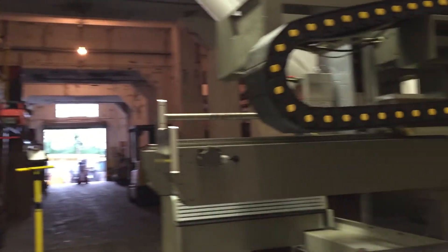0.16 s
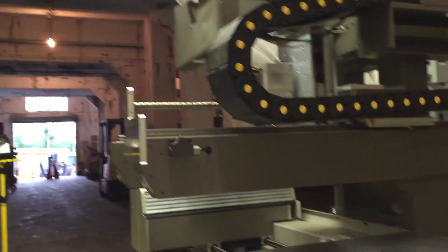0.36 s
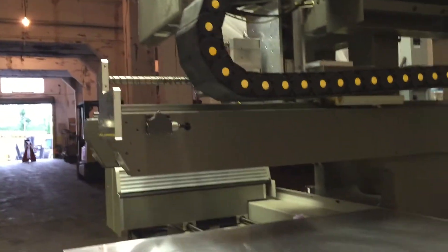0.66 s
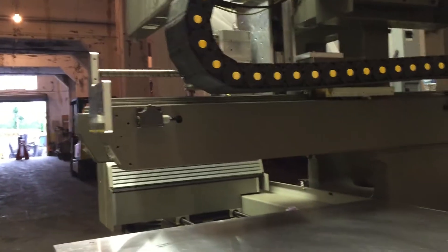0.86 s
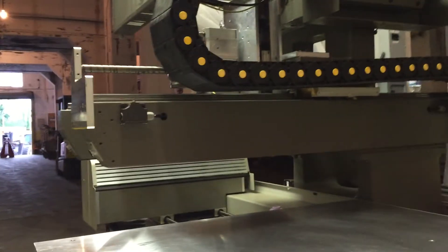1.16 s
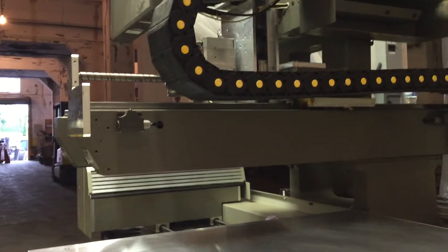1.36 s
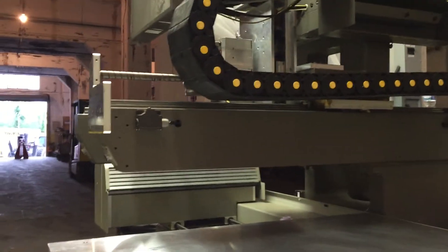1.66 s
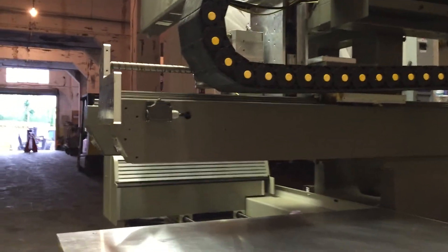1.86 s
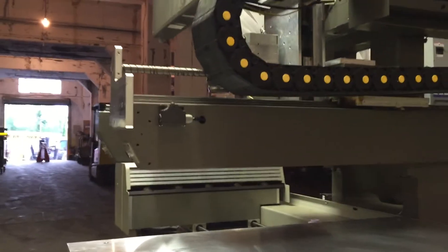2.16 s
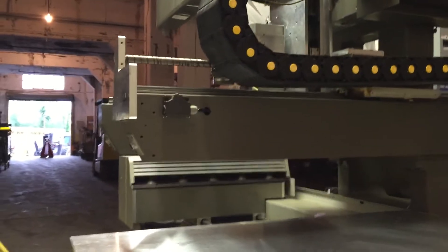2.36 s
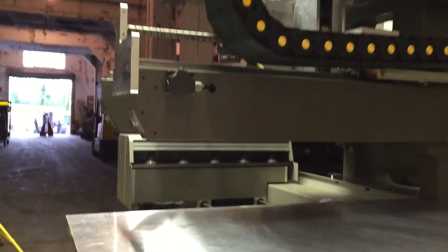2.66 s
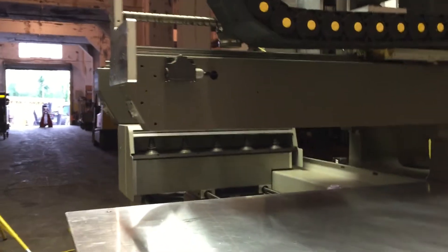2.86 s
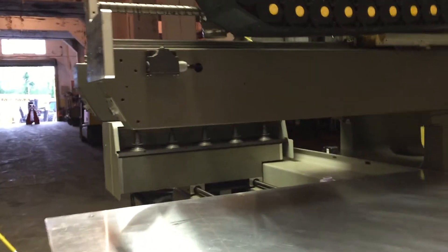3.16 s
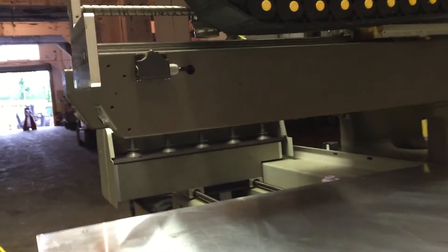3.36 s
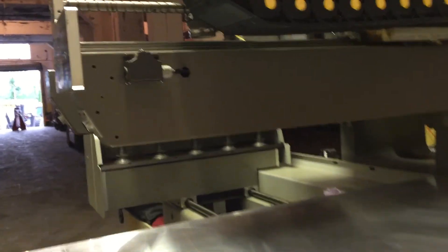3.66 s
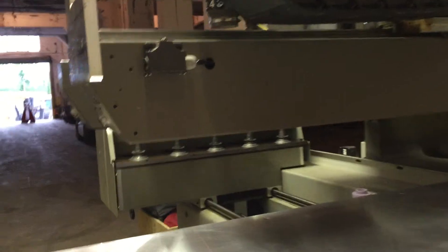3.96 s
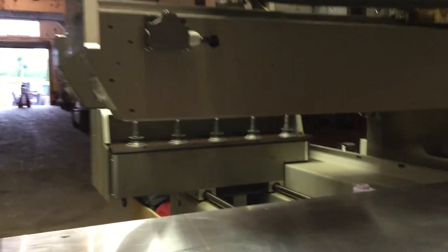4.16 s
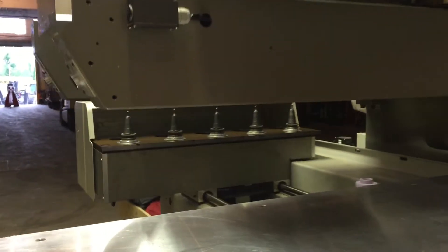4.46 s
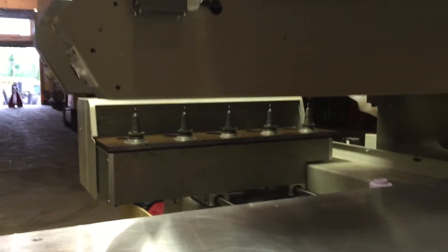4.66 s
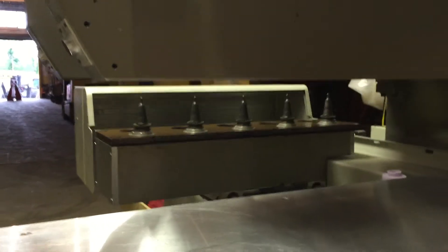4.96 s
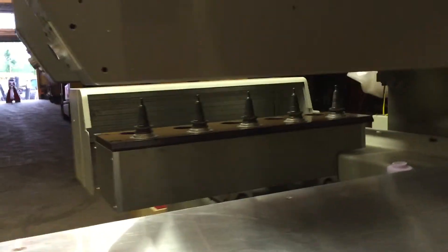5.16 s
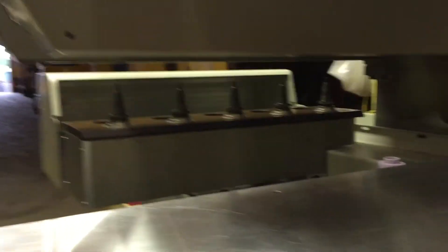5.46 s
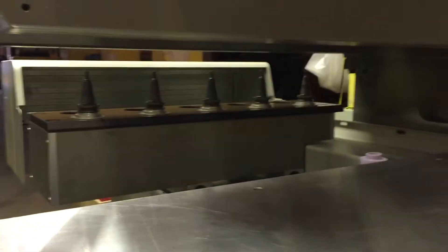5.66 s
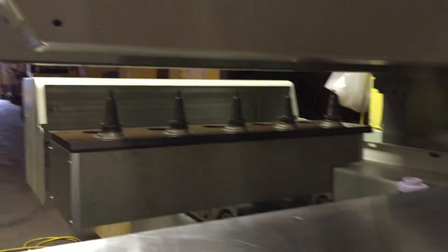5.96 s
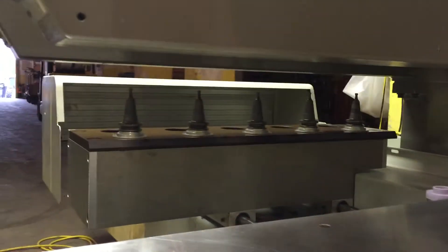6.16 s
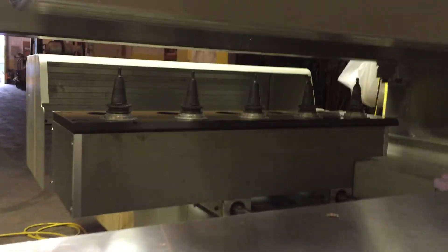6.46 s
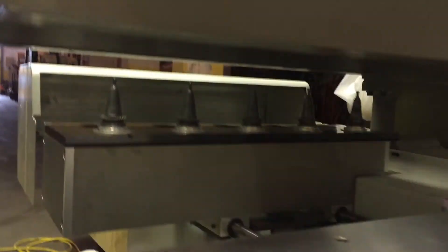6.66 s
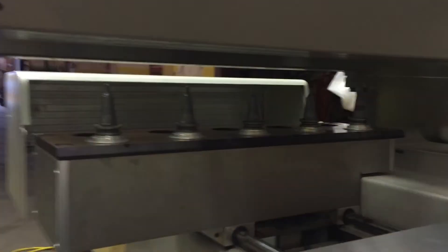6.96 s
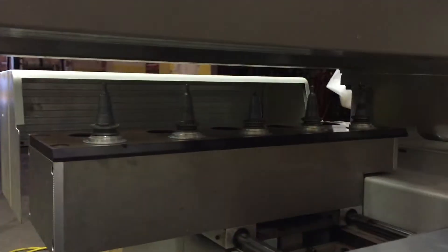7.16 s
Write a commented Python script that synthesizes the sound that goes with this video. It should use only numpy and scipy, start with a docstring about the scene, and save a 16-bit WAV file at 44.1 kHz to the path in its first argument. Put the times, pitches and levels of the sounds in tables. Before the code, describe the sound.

Close beside a steel machine in a large, reverberant workshop, heard in mono. From 0 s a heavy gantry is already rolling, a rough rumble with motor hum and thin high servo whine; a light tick and knock come at 0.3 s, and it brakes to rest by about 1 s, leaving an echo tail and faint shop noise. At 1.56 s a valve spits twice rapidly, and a soft steady air hiss begins; small taps at 2.06 s. At 3.46 s a thump and spit open a strong blast of compressed air, bright, hollow and breathy, its tone sinking slightly, lasting until about 5.3 s. Beneath it a rack slides out with a low drone and growing thrum. Clunks cluster at 5.2-5.3 s and 5.55 s, when the thin hiss shuts off. From 6.1 s the gantry rolls again, rumbling and whining, with heavy knocks at 6.4, 6.6 and 6.8 s, then a crisp tick near 7 s as it slows.

```python
"""A CNC router in a big workshop changes its tool, heard in mono, close to the steel frame.
First the gantry, already moving, rolls to a stop: filtered noise for the rolling, tones for the whining servos.
A valve spits in short noise bursts and purge air starts to hiss. Then a cylinder vents in a long blast of noise
with a breathy tone, while the tool rack slides out with a drone and clunks against its stop: struck resonances.
Last, the gantry rolls on with more knocks and ticks. A low thrum and faint shop noise lie under it all."""
import sys
import numpy as np
from scipy import signal
from scipy.fft import rfft, irfft, next_fast_len
from scipy.io import wavfile
from scipy.ndimage import uniform_filter1d

SR = 44100
rng = np.random.default_rng(int(sys.argv[2]) if len(sys.argv) > 2 else 0)


def bounce(signal):
    """Save signal as a 16-bit WAV file at the path given by the first command-line argument."""
    frames = np.transpose(np.atleast_2d(signal))
    limited = np.clip(frames, -1, 1)
    pcm = np.round(limited * 32767).astype(np.int16)
    wavfile.write(sys.argv[1], SR, pcm)


N = 321930
TIME = np.arange(N) / SR   # seconds

# The gantry's moves. Each row: start in seconds, run-up in seconds, cruise in seconds, braking in seconds,
# torque ripple at full speed in Hz, rumble level in dB, rush level in dB.
MOVES = [(-.5, 0.42, 0.53, 0.506, 200, -32, -32), (6.075, .39, 0.43, 0.45, 240.6, -27.5, -31.5)]
# Colour of the rolling in the first move. Each row: frequency in Hz, relative level in dB per Hz.
FIRST_MOVE_COLOUR = [(120, -37), (150, -9), (190, 1), (245, -7), (280, -3), (320, -5), (370, -1.5),
                     (540, 0.5), (640, -5), (850, -9.5), (1900, -16.5), (3300, -25.5), (4800, -34),
                     (6000, -33), (15000, -47)]
# Colour of the rolling in the second move. Each row: frequency in Hz, relative level in dB per Hz.
SECOND_MOVE_COLOUR = [(130, -16.5), (190, -6), (250, -3), (310, -6), (400, 1.5), (500, 0), (650, -7),
                      (800, -13.5), (1400, -13.5), (2500, -21.5), (3400, -23.5), (4900, -33.5), (6200, -32),
                      (7600, -38), (15000, -43.5)]
# Whine that follows the ripple. Each row: multiple of the switching rate,
# number of ripple steps above it (minus: below), relative level in dB.
WHINE_SIDEBANDS = [(1, -1, -0.5), (1, 1, 0.5), (1, 2, -21)]
# Servo whine during each move, one list of rows per move. Each row: time in seconds, level in dB.
SERVO_WHINE = [
    [(0.0, -45), (0.082, -53), (0.256, -59), (0.332, -46), (0.462, -65), (0.544, -63), (0.664, -53),
     (0.722, -63), (0.798, -55), (0.862, -71), (0.912, -80), (0.95, -92)],
    [(6.0, -82), (6.046, -66), (6.438, -41), (6.572, -50), (6.726, -44), (6.752, -51), (6.926, -51),
     (6.958, -79), (6.988, -49), (7.14, -70), (7.23, -57), (7.3, -63)],
]
# Steady whine of the servos. Each row: multiple of the switching rate, level in dB.
HOLDING_WHINE = [(1, -73.5), (2, -69), (3, -74.5), (4, -95)]
# Bright jet of the cylinder. Each row: frequency in Hz, relative level in dB per Hz.
JET_COLOUR = [(900, -21), (2500, -35), (4200, 1.5), (6700, 2.5), (7600, -1.5), (8900, 1.5), (9900, 0),
              (10400, -6), (11000, -1.5), (13300, -0.5), (15300, -2)]
# Hollow ring of the cylinder's port. Each row: frequency in Hz, relative level in dB per Hz.
PORT_COLOUR = [(400, -57), (750, -21), (1100, -13), (1500, -2.5), (1750, -3), (2150, -4.5), (2650, -1.5),
               (3080, 0.5), (3450, -0.5), (4000, -4), (5500, -20)]
# Valve spits. Each row: start in seconds, level in dB, time to fall 60 dB in seconds.
VALVE_SPITS = [(1.558, -35, 0.28), (1.576, -28, 0.61), (3.477, -38, .12)]
# Colour of the spits. Each row: frequency in Hz, relative level in dB per Hz.
SPIT_COLOUR = [(400, -25), (760, 3), (1020, -24), (1400, -2), (2300, -8.5), (2950, 2), (4200, -7),
               (6200, 2), (7200, -2.5), (8600, 3.5), (10400, -3), (11400, -0.5), (15300, -3.5)]
# Colour of the purge air. Each row: frequency in Hz, relative level in dB per Hz.
PURGE_COLOUR = [(110, -6), (175, -8.5), (260, -2.5), (350, -17), (600, -6), (760, -16.5), (1000, -9),
                (1500, -10), (2200, -5.5), (3200, -1), (4600, 1.5), (9200, -5.5), (10400, -14.5),
                (13200, -16.5), (15300, -6)]
# Drone of the sliding rack. Each row: frequency in Hz, relative level in dB per Hz.
SLIDE_COLOUR = [(120, -22), (230, -0.5), (310, -11.5), (380, -0.5), (450, -10), (535, -4.5), (600, -15.5),
                (850, -19), (1200, -7), (1700, -18.5), (5000, -27.5)]
# Blows on the frame. Each row: start in seconds, strength in dB, low thud level in dB,
# time to fall 60 dB in seconds, brightness (lowpass) in Hz.
FRAME_BLOWS = [(0.303, -40, -38, .2, 900), (1.575, -43, -37.5, 0.71, 2000), (2.056, -42.5, -56, 0.38, 5000),
               (2.081, -49, -45, 0.27, 584), (3.457, -35.5, -39, 0.27, 500), (3.492, -37, -38, 0.59, 1010),
               (5.219, -20.5, -40, 0.094, 2200), (5.236, -25, -48, 0.29, 2000),
               (5.274, -26.5, -50, .1, 2200), (5.314, -26, -42, 0.14, 1790), (5.54, -17.5, -50, 0.07, 1030),
               (5.558, -24.5, -40, 0.31, 970), (6.389, -25, -24, 0.26, 600), (6.6, -16.5, -23, 0.055, 945),
               (6.783, -18.5, -23, .1, 645), (6.965, -27, -35, 0.19, 1500)]
# Resonances of the frame. Each row: frequency in Hz, width in Hz, relative level in dB.
FRAME_MODES = [(380, 59, -2.5), (476, 43, -7), (647, 140, -3), (878, 140, -4.5), (1130, 60, -0.5),
               (1400, 95, -5.5), (1800, 520, -1)]
# Guide rods that ring on. Each row: frequency in Hz, width in Hz, relative level in dB.
ROD_MODES = [(660, 8, -6), (1215, 11, -2)]
# Colour of the thuds. Each row: frequency in Hz, relative level in dB per Hz.
THUD_COLOUR = [(50, -17), (110, -15), (170, 4.5), (250, -4.5), (400, -13)]
# Small metal ticks. Each row: start in seconds, level in dB, time to fall 60 dB in seconds.
METAL_TICKS = [(.306, -37.5, 0.042), (.31, -42, 0.31), (6.237, -40, .04), (6.594, -38, .08),
               (6.782, -39, 0.11), (6.988, -21, 0.014)]
# Colour of the ticks. Each row: frequency in Hz, relative level in dB per Hz.
TICK_COLOUR = [(1500, -30), (3500, 4.5), (5000, 0), (6600, -1), (7600, -2), (9000, -7), (15000, -12)]
# Colour of the machine's thrum. Each row: frequency in Hz, relative level in dB per Hz.
THRUM_COLOUR = [(20, -36), (40, -18), (55, -7), (72, -2.5), (85, 2.5), (100, 3.5), (120, -1.5), (150, -2.5),
                (220, -21)]
# Colour of the shop floor noise. Each row: frequency in Hz, relative level in dB per Hz.
SHOP_COLOUR = [(50, -7), (100, -26), (160, 6.5), (240, -6), (310, -12.5), (570, -18), (800, -12),
               (1200, -8), (1900, -13.5), (2400, -28), (4000, -24), (6000, -37), (15000, -40)]

# Rolling
EASING_S = 0.14   # the drives round off each change of speed
RUMBLE_LAW, RUSH_LAW, SIZZLE_LAW = 0.57, 1.0, 1.74   # each grows as this power of speed
SIZZLE_HZ = 4430   # above this the rush needs more speed
PULL_DB, BRAKE_DB = 4, 2.5   # extra rumble while the drives speed up, and while they brake

# Motors and servos
SWITCHING_HZ = 3124.7
HUM_DB, HUM_LAW = -24, 0.43   # motor hum on the beam's resonance; power of speed
BEAM_HZ, BEAM_WIDTH_HZ = 236, 10.2
SIDEBAND_DB, SIDEBAND_LAW = -53.5, 1.1   # gliding whine at full speed; power of speed
SIDEBAND_PULL_DB = 7   # stronger while the drives speed up
OVERTONE_DB, OVERTONE_LAW = -68, 0.5   # the whine's octave at full speed; power of speed
SETTLE_DB, SETTLE_S = -68.5, 0.064   # the switching tone swells as servos take up and put down the load

# Cylinder exhaust: held level (dB), surplus on opening (dB), rise (s)
BLAST_OPENS_S = 3.492
JET_DB, JET_SURGE_DB, JET_RISE_S = -26, 2.5, 0.038
PORT_DB, PORT_SURGE_DB, PORT_RISE_S = -30, 7, 0.046
SURGE_S, BLAST_HOLD_S, BLAST_FADE_S = 0.093, 1.672, 0.28   # the surge peaks, the flow holds, it runs empty
CRACK_SHARE = 0.83   # the valve snaps this far open at once, then eases the rest of the way
LEAK_DB = -64.5   # air that still seeps from the empty cylinder
# Edge tone of the port: it swells against the port's ring and sinks with the pressure
EDGE_DB, EDGE_SWELL_S, EDGE_HOLD_S, EDGE_FADE_S = -0.5, 0.6, 0.59, 0.89
EDGE_HZ, EDGE_SHARP_HZ, EDGE_SAG_S = 2990, 380, 0.73

# Purge air, and the rack sliding on its rods
PURGE_DB, PURGE_ENDS_S, PURGE_FADE_S = -38.5, 5.56, 0.14
SLIDE_STARTS_S, SLIDE_RISE_S, SLIDE_HOLD_S, SLIDE_FALL_S, SLIDE_DB = 3.72, 0.83, 0.98, 1, -43.5

# Thrum: idle machine (dB), what it gains as it grows from the rack's start time on (dB), rolling gantry (dB
# against its rumble)
IDLE_THRUM_DB, RISEN_THRUM_DB, TRAVEL_THRUM_DB = -58, -49.5, -13.5
JOLT_DB, JOLT_T60_S = -45.5, 0.72   # the cylinder jolts the machine as it vents

HALL_T60_S = 1.97   # time for the hall's echo to fall 60 dB
CUTOFF_HZ = 15280   # top of the finished sound


def from_db(db):
    """Decibels to gain."""
    return 10 ** (np.asarray(db) / 20)


def rms_one(x):
    """Scale to unit rms."""
    return x / np.sqrt(np.mean(x ** 2) + 1e-20)


def drift(rate_hz):
    """Slow random wandering with rms 1, made at a fortieth of the sample rate."""
    r = np.exp(-80 * np.pi * rate_hz / SR)
    raw = rng.standard_normal(N // 40 + 2002)
    slow = signal.lfilter([1], [1, -2 * r, r * r], raw)[2000:]   # skip the filter's start
    return np.interp(np.arange(N) / 40, np.arange(len(slow)), rms_one(slow))


def noise(colour):
    """Noise with a given spectrum, falling 24 dB per octave beyond its ends; rms 1."""
    size = next_fast_len(N)
    octave = np.log2(np.maximum(np.arange(size // 2 + 1) * SR / size, 1))
    hz, db = np.transpose(colour)
    points = np.log2(hz)
    beyond = np.maximum(points[0] - octave, 0) + np.maximum(octave - points[-1], 0)
    gain = from_db(np.interp(octave, points, db) - 24 * beyond)
    spectrum = rfft(rng.standard_normal(size)) * gain
    return rms_one(irfft(spectrum, size)[:N])


def lowpass(x, hz, order=2):
    """Take off the top."""
    sos = signal.butter(order, min(hz, 0.45 * SR), fs=SR, output="sos")
    return signal.sosfilt(sos, x + 1e-18)


def resonate(x, hz, width_hz):
    """One resonance; white noise keeps its power."""
    r = np.exp(-np.pi * width_hz / SR)
    feed = np.sqrt((1 - r * r) / 2) * np.array([1, 0, -1])
    feedback = [1, -2 * r * np.cos(2 * np.pi * hz / SR), r * r]
    return signal.lfilter(feed, feedback, x + 1e-18)


def phase_of(hz):
    """Running phase of a gliding tone."""
    return 2 * np.pi * np.cumsum(hz) / SR


def unsteady_tone(phase, width_hz):
    """A tone whose strength and phase wander at random; rms near 1."""
    return drift(width_hz) * np.cos(phase) + drift(width_hz) * np.sin(phase)


def opens(at_s, rise_s=0.0056):
    """A straight opening from 0 to 1, as of a valve."""
    return np.clip((TIME - at_s) / rise_s, 0, 1)


def empties(at_s, fade_s):
    """Air pressure running out, slowly at first."""
    return np.exp(-(np.maximum(TIME - at_s, 0) / fade_s) ** 2)


def swell(start_s, rise_s, hold_s, fall_s):
    """Straight rise, hold and straight fall, 0 to 1."""
    corners = start_s + np.cumsum([0, rise_s, hold_s, fall_s])
    return np.interp(TIME, corners, [0, 1, 1, 0])


def bursts(rows):
    """Envelope of sudden starts that die away, from rows (s, dB, t60)."""
    total = np.zeros(N)
    for start_s, db, t60 in rows:
        fall_db = 60 * np.clip((TIME - start_s) / t60, 0, 3)
        total += opens(start_s, rise_s=0.001) * from_db(db - fall_db)
    return total


def level(rows, fade_s=0.08):
    """Gain along a dB curve, dying away outside its span."""
    s, db = np.transpose(rows)
    outside = np.maximum(s[0] - TIME, 0) + np.maximum(TIME - s[-1], 0)
    return from_db(np.interp(TIME, s, db)) * np.exp(-outside / fade_s)


def lingers(gain, hall_db):
    """Envelope of a noise together with its dying tail in the hall."""
    r = from_db(-120 / (HALL_T60_S * SR))   # power falls 60 dB in the hall's time
    tail_power = signal.lfilter([1 - r], [1, -r], gain ** 2 + 1e-18)
    return np.sqrt(gain ** 2 + from_db(hall_db) ** 2 * tail_power)


def speed_of(move):
    """The gantry runs up, cruises and brakes with rounded corners: share of full speed."""
    return np.maximum(uniform_filter1d(swell(*move[:4]), size=max(int(EASING_S * SR), 1)), 0)


def gantry(move, colour, rumble_rough_db, rush_rough_db, surge_db=1.0):
    """Balls rolling in the guides shake the frame and rush above it, louder and brighter with speed."""
    start, run_up, cruise, braking, ripple_hz, rumble_db, rush_db = move
    speed = speed_of(move)
    pull = np.gradient(speed, TIME) * run_up   # 1 at full run-up, negative when braking
    strain_db = PULL_DB * np.maximum(pull, 0) + BRAKE_DB * np.maximum(-pull, 0) + surge_db * drift(22)
    rumble = lowpass(noise(colour), 890)
    rush = signal.sosfilt(signal.butter(2, 800, "high", fs=SR, output="sos"), noise(colour))
    jolts = drift(46)   # the same bumps shake both
    rumble = rms_one(rumble * from_db(rumble_rough_db * jolts))
    rush = rms_one(rush * from_db(rush_rough_db * jolts))
    dull = lowpass(rush, SIZZLE_HZ, order=1)
    sizzle = rush - dull
    rumble_gain = from_db(rumble_db + strain_db) * lingers(speed ** RUMBLE_LAW, hall_db=-7.5)
    rushing = lingers(speed ** RUSH_LAW, hall_db=-16) * dull + speed ** SIZZLE_LAW * sizzle
    return rumble_gain * rumble + from_db(rush_db) * rushing


def motors(wobble=0.0044, overtone_db=-6):
    """Torque ripple hums at a pitch set by speed, loudest on the beam, and splits the whine into sidebands."""
    speed = sum(speed_of(move) for move in MOVES)
    ripple_hz = sum(move[4] * speed_of(move) for move in MOVES)
    ripple = phase_of(ripple_hz * (1 + wobble * drift(8.5)))
    beam = 1 / np.hypot(1, 2 * (ripple_hz - BEAM_HZ) / BEAM_WIDTH_HZ)
    hum = from_db(1.7 * drift(4)) * (np.sin(ripple) + from_db(overtone_db) * np.sin(2 * ripple))
    switching = 2 * np.pi * SWITCHING_HZ * TIME
    whine = np.zeros(N)
    for multiple, side, db in WHINE_SIDEBANDS:
        whine += from_db(db) * unsteady_tone(multiple * switching + side * ripple, width_hz=13.4)
    pull = np.maximum(np.gradient(speed), 0)
    whine_db = SIDEBAND_DB + SIDEBAND_PULL_DB * pull / pull.max()
    humming = from_db(HUM_DB) * speed ** HUM_LAW * beam * hum
    return humming + from_db(whine_db) * speed ** SIDEBAND_LAW * whine


def servos(waver_db=3.4):
    """Motor windings sing at multiples of the switching rate, some steadily and some with the moves."""
    phase = 2 * np.pi * SWITCHING_HZ * TIME
    whine_gain = sum(level(rows) for rows in SERVO_WHINE) * from_db(waver_db * drift(14))
    whine = whine_gain * np.sin(2 * phase + 0.23 * drift(25))
    speed = sum(speed_of(move) for move in MOVES)
    overtone = from_db(OVERTONE_DB) * speed ** OVERTONE_LAW * unsteady_tone(4 * phase, width_hz=28)
    settling_gain = np.zeros(N)
    for move in MOVES:
        for edge_s in (move[0] - 2 * SETTLE_S, sum(move[:4]) - SETTLE_S / 2):   # start and stop
            settling_gain += swell(edge_s, SETTLE_S, 0, 2 * SETTLE_S)
    settling = from_db(SETTLE_DB) * settling_gain * np.sin(phase)
    holding = sum(from_db(db) * np.sin(multiple * phase) for multiple, db in HOLDING_WHINE)
    return np.sqrt(2) * (whine + overtone + settling + holding)


def exhaust():
    """The cylinder vents: a bright jet, the hollow ring of its port and a breathy edge tone."""
    age = np.maximum(TIME - BLAST_OPENS_S, 0)
    surge = age / SURGE_S * np.exp(1 - age / SURGE_S)
    pressure = empties(BLAST_OPENS_S + BLAST_HOLD_S, BLAST_FADE_S)
    edge_hz = EDGE_HZ + EDGE_SHARP_HZ * np.exp(-age / EDGE_SAG_S)
    edge_gain = from_db(EDGE_DB) * swell(BLAST_OPENS_S, EDGE_SWELL_S, EDGE_HOLD_S, EDGE_FADE_S)
    edge = edge_gain * unsteady_tone(phase_of(edge_hz), width_hz=174)
    ringing = from_db(PORT_DB + PORT_SURGE_DB * surge) * opens(BLAST_OPENS_S, PORT_RISE_S) * pressure
    port = lingers(ringing, hall_db=-14) * rms_one(noise(PORT_COLOUR) + edge)
    valve = CRACK_SHARE * opens(BLAST_OPENS_S) + (1 - CRACK_SHARE) * opens(BLAST_OPENS_S, JET_RISE_S)
    jet_gain = from_db(JET_DB + JET_SURGE_DB * surge) * pressure + from_db(LEAK_DB)
    jet = jet_gain * valve * noise(JET_COLOUR)
    return (jet + port) * from_db(0.43 * drift(29))


def knocks(impact_db=19.5):
    """Each blow is an impact and a dying rattle that ring the frame and rods, over a low thud."""
    force = np.zeros(N)
    for start_s, db, thud_db, t60, bright_hz in FRAME_BLOWS:
        blow = bursts([(start_s, db, t60)]) * rng.standard_normal(N)
        blow[int(start_s * SR)] += from_db(db + impact_db)
        force += lowpass(blow, bright_hz)
    ring = np.zeros(N)
    for k, (hz, width_hz, db) in enumerate(FRAME_MODES + ROD_MODES):
        ring += (-1) ** k * from_db(db - 5.5) * resonate(force, hz, width_hz)   # signs alternate
    thuds = bursts([(start_s, thud_db, t60) for start_s, db, thud_db, t60, bright_hz in FRAME_BLOWS])
    return ring + thuds * noise(THUD_COLOUR)


def ticks():
    """Small metal parts tick: short bright bursts of noise."""
    return bursts(METAL_TICKS) * noise(TICK_COLOUR)


def slide():
    """The rack gathers speed along its rods, and their drone dies after it stops."""
    gain = swell(SLIDE_STARTS_S, SLIDE_RISE_S, SLIDE_HOLD_S, SLIDE_FALL_S)
    return from_db(SLIDE_DB) * gain * noise(SLIDE_COLOUR)


def purge():
    """The valve spits, and a thin steady stream of air flows from the second spit on until it is shut off."""
    valve = opens(VALVE_SPITS[1][0]) * empties(PURGE_ENDS_S, PURGE_FADE_S)
    flow = lingers(valve, hall_db=-29)
    stream = from_db(PURGE_DB) * flow * noise(PURGE_COLOUR) * from_db(0.084 * drift(24))
    return stream + bursts(VALVE_SPITS) * noise(SPIT_COLOUR)


def thrum(rise_s=0.55):
    """The low thrum grows from about 3.7 s on and when the gantry rolls; the venting cylinder jolts it."""
    rolling = lingers(sum(from_db(move[5]) * speed_of(move) for move in MOVES), hall_db=-10)
    standing = from_db(IDLE_THRUM_DB) + from_db(RISEN_THRUM_DB) * opens(SLIDE_STARTS_S, rise_s)
    jolt = bursts([(BLAST_OPENS_S, JOLT_DB, JOLT_T60_S)])
    return (standing + from_db(TRAVEL_THRUM_DB) * rolling + jolt) * noise(THRUM_COLOUR)


def shop_floor():
    """Faint steady noise of the workshop."""
    return from_db(-55) * noise(SHOP_COLOUR)


def panels(x, count=24):
    """Steel panels and the floor send back early echoes that comb the spectrum lightly."""
    out = x.copy()
    delays_s = rng.uniform(0.001, 0.03, count)
    gains = rng.choice([-0.085, 0.085], count)
    for delay_s, gain in zip(delays_s, gains):
        lag = int(delay_s * SR)
        out[lag:] += gain * x[:-lag]
    return out * np.std(x) / np.std(out)   # keep the loudness


def scene():
    """Machine, air and shop floor noise, the same in both ears."""
    travel = (gantry(MOVES[0], FIRST_MOVE_COLOUR, rumble_rough_db=-0.1, rush_rough_db=0.4)
              + gantry(MOVES[1], SECOND_MOVE_COLOUR, rumble_rough_db=0.1, rush_rough_db=1.0))
    drives = motors() + servos() + thrum()
    rack = slide() + knocks() + ticks()
    echoed = panels(travel + rack + purge() + exhaust())
    mono = echoed + drives + shop_floor()
    return np.array([mono, mono])


def record(dry):
    """The top is cut steeply."""
    return signal.sosfilt(signal.ellip(12, 0.1, 80, CUTOFF_HZ, fs=SR, output="sos"), dry)


dry = scene()
out = record(dry)
bounce(out)
```